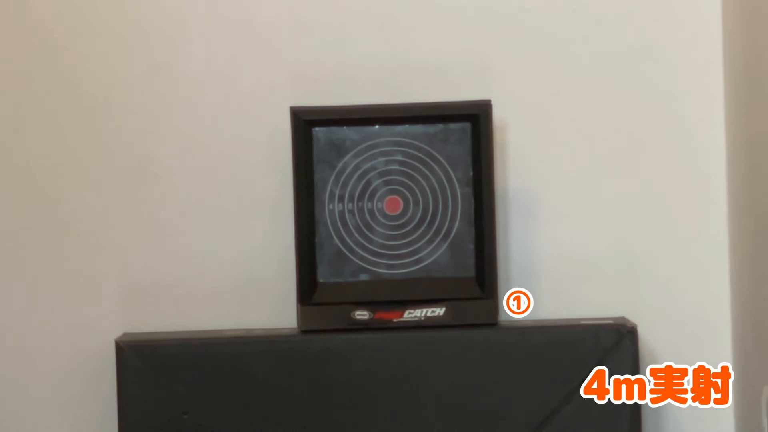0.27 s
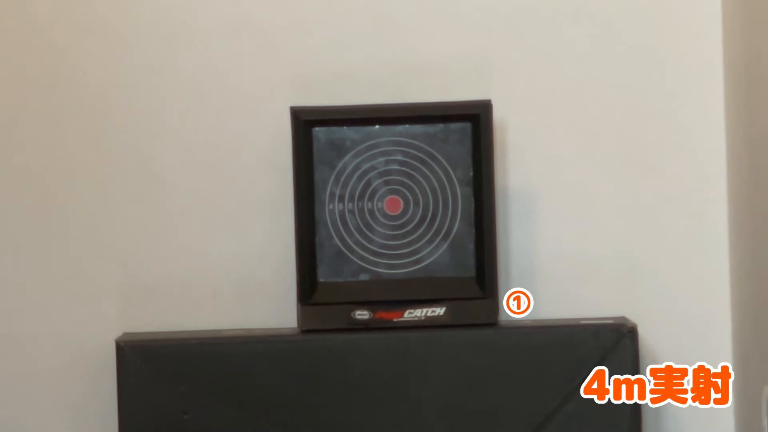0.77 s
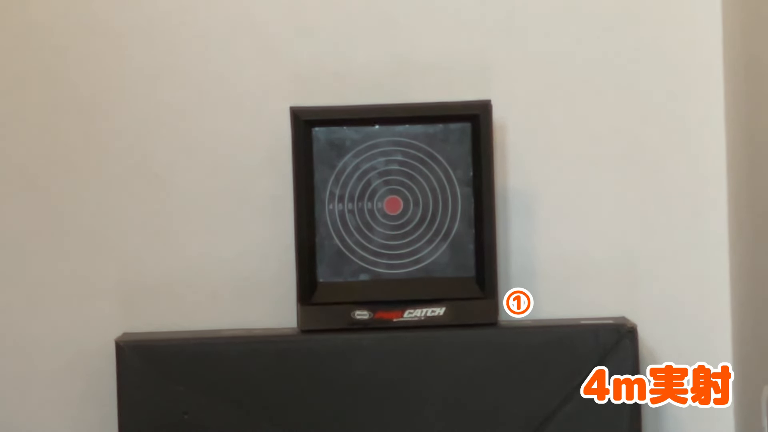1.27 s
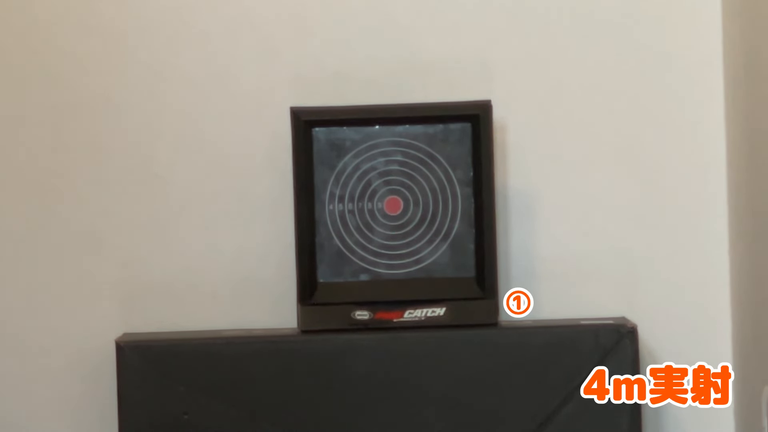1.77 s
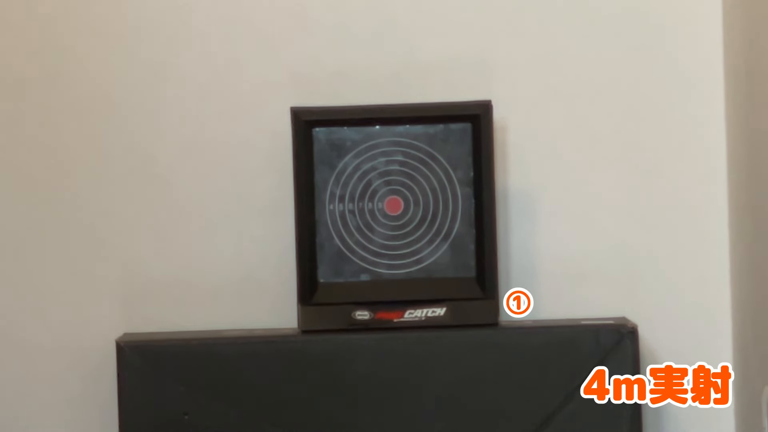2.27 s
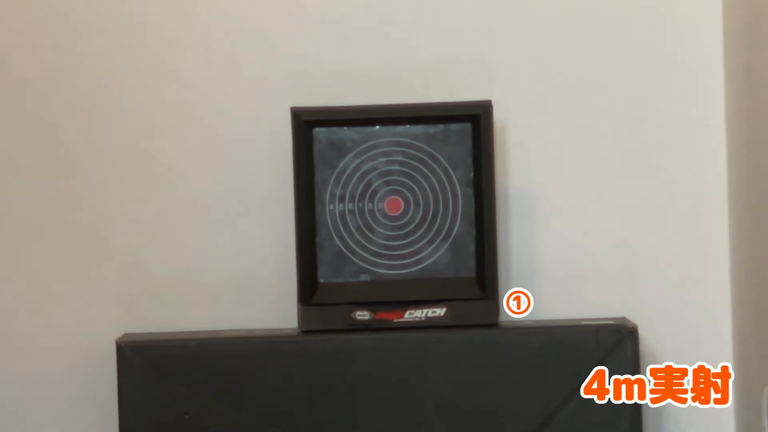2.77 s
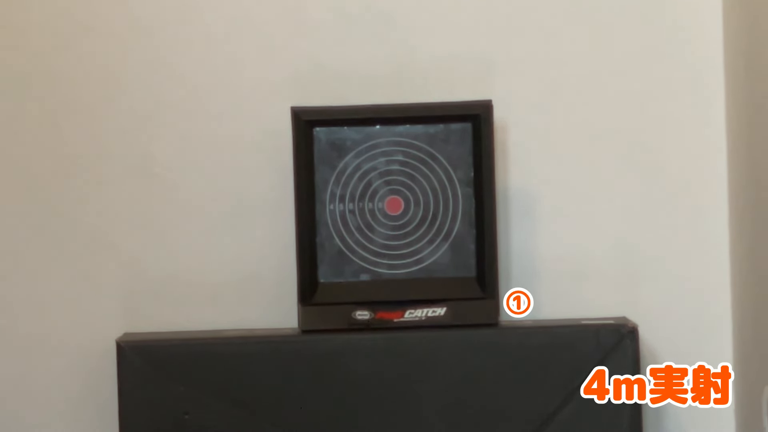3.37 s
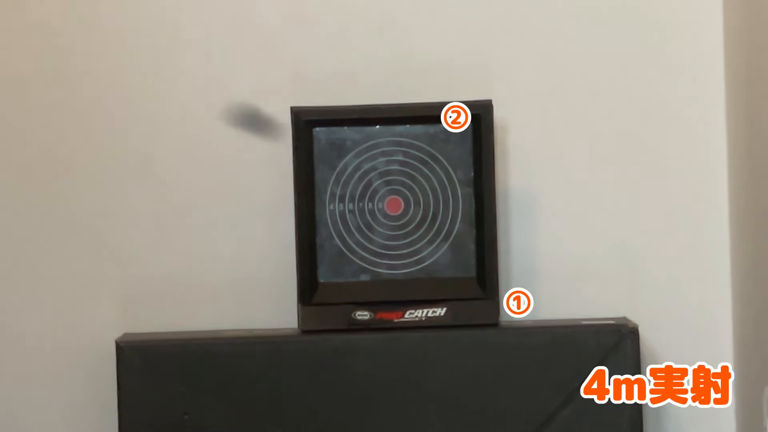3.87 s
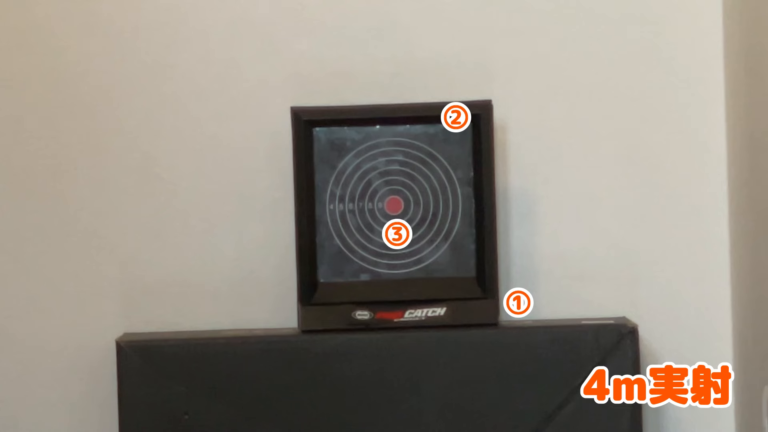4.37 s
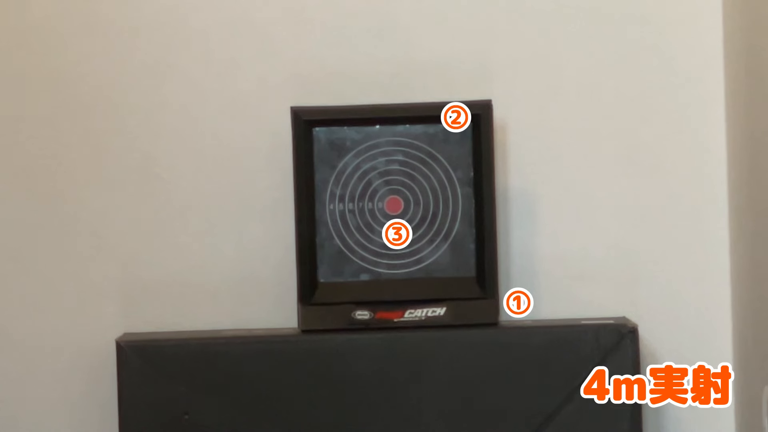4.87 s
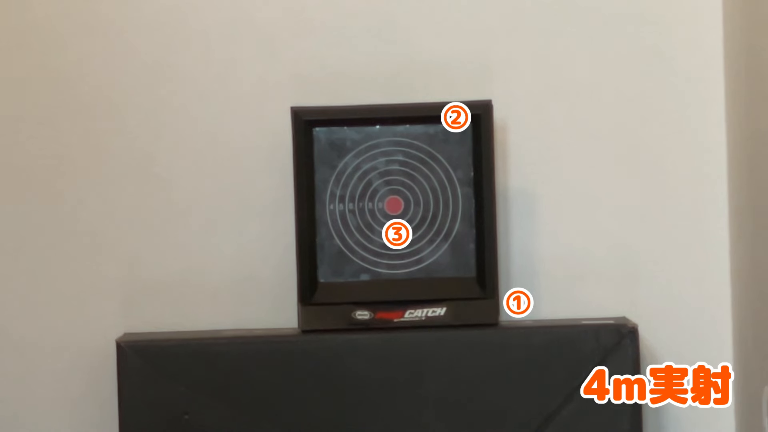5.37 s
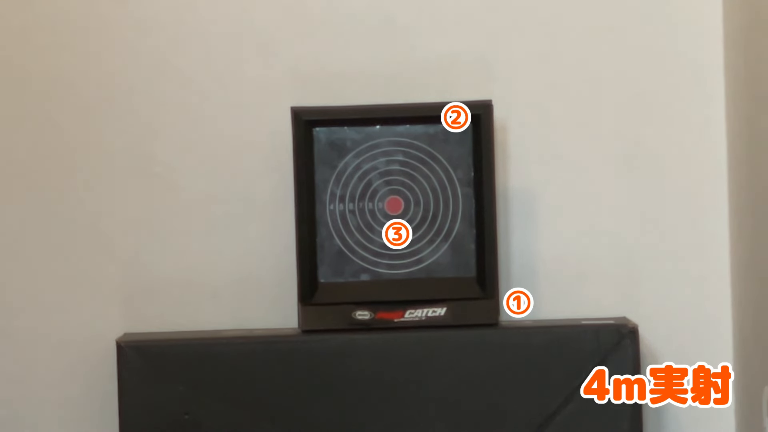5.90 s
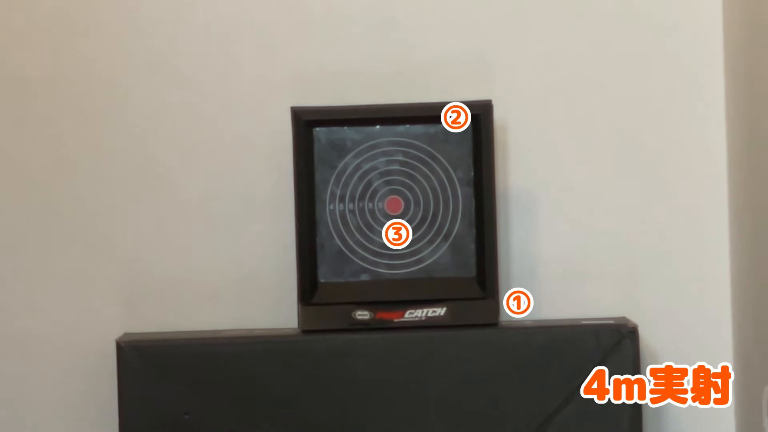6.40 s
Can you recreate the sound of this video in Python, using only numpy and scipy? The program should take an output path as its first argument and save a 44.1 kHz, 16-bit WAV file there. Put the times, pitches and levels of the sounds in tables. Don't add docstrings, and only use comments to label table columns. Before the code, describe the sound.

A toy electric pistol fires once in a bare room: sharp slap, gear rattle, deep knocks, then pellet and case bounce over hard floor.

```python
import sys
import numpy as np
from scipy import signal
from scipy.fft import rfft, irfft, next_fast_len
from scipy.io import wavfile
from scipy.ndimage import uniform_filter1d, map_coordinates

SR = 44100
rng = np.random.default_rng(int(sys.argv[2]) if len(sys.argv) > 2 else 0)


def dump_mix(stems):
    frames = np.atleast_2d(stems).T
    limited = np.clip(frames, -1, 1)
    pcm = np.round(limited * 32767).astype(np.int16)
    wavfile.write(sys.argv[1], SR, pcm)


def boost(x):
    u = np.asarray(x, float) / 20
    return 10 ** u


N = 292824
SPAN = SR * 3 // 4
LEAD = SR // 10


def unit(x):
    return x / np.sqrt(np.mean(x ** 2) + 1e-20)


def along(points, hz):
    f, v = np.transpose(points)
    return np.interp(np.log(hz + 1), np.log(f + 1), v)


def curve(rows):
    return np.interp(np.arange(N) / SR, *np.transpose(rows))


def wobble(rate):
    knots = rng.standard_normal(int(N * rate / SR) + 4)
    return map_coordinates(knots, [np.arange(N) * rate / SR])


def rush(spectrum):
    m = next_fast_len(N + 8192)
    gain = boost(along(spectrum, np.fft.rfftfreq(m, 1 / SR)))
    return unit(irfft(rfft(rng.standard_normal(m)) * gain, m)[:N])


def body(spectrum, tilt_db, part_hz, part_db, size=4096):
    hz = np.fft.rfftfreq(size, 1 / SR)
    part = part_db * np.exp(-(np.log2((hz + 1) / part_hz) / 0.35) ** 2)
    gain = boost(along(spectrum, hz) + part + tilt_db * np.log2((hz + 100) / 2000))
    cepstrum = irfft(np.log(gain + 1e-6))
    cepstrum[1:size // 2] *= 2
    cepstrum[size // 2 + 1:] = 0
    return irfft(np.exp(rfft(cepstrum)))[:size // 2]


# pitch_hz, t60_s
ROOM_DECAY = [(100, .6), (300, 0.43), (1000, 0.6), (3000, 0.57), (7000, 0.54), (15000, 0.36)]


def echo(gap_s, walls_db):
    hz, t, z = signal.stft(rng.standard_normal(SPAN), SR, nperseg=256)
    fade = boost(-60 * t / along(ROOM_DECAY, hz)[:, None])
    tail = signal.istft(z * fade, SR, nperseg=256)[1][:SPAN]
    t = np.arange(SPAN) / SR
    walls = np.repeat(rng.standard_normal(SPAN // 64 + 1), 64)[:SPAN]
    tail = tail * boost(walls_db * walls * np.exp(-t / 0.032))
    tail = tail * (1 - np.exp(-(t / gap_s) ** 2))
    return tail / np.linalg.norm(tail)


def add(track, s, sound):
    part = track[LEAD + round(s * SR):][:len(sound)]
    part += sound[:len(part)]


def blows(events, spectrum, click, rise_s, stop, gap_s, walls_db, part_db, far_db):
    track = np.zeros(LEAD + N)
    t = np.arange(SR // 20) / SR
    before = -1
    for s, db, tilt_db, t60, room_db, part_hz in events:
        fade = boost(-60 * (t / max(t60, 1e-3)) ** stop)
        force = rng.standard_normal(len(t)) * fade * (1 - np.exp(-t / rise_s))
        force[0] = click
        near = signal.fftconvolve(force, body(spectrum, tilt_db, part_hz, part_db))
        near *= boost(db) / np.abs(near).max()
        far = body(spectrum, tilt_db, part_hz, far_db)
        spread = np.linalg.norm(near) / np.linalg.norm(far)
        fresh = echo(gap_s, walls_db)
        if s - before < .002:
            fresh += uniform_filter1d(tail - fresh, size=5)
        before, tail = s, fresh
        add(track, s, near)
        add(track, s, boost(room_db) * spread * signal.fftconvolve(far, tail))
    return track[LEAD:]


def rings(events, overtone, rough):
    track = np.zeros(LEAD + N)
    t = np.arange(SR // 10) / SR
    for s, db, hz, t60, room_db in events:
        drift = rough * np.cumsum(rng.standard_normal(len(t)))
        tone = np.sin(2 * np.pi * hz * t + drift) + 0.34 * np.sin(2 * np.pi * overtone * hz * t)
        near = boost(db - 60 * t / max(t60, 1e-3)) * (1 - np.exp(-t / 0.00085)) * tone
        add(track, s, near)
        add(track, s, boost(room_db) * signal.fftconvolve(near, echo(0.0059, walls_db=7)))
    return track[LEAD:]


# pitch_hz, rms_db
HUM_LINES = [(242.2, -67.5), (360.7, -72), (414.5, -71), (511.4, -82.5), (769.8, -83.5)]


def hum():
    t = np.arange(N) / SR
    total = np.zeros(N)
    for hz, db in HUM_LINES:
        level = np.sqrt(2) * boost(db + 1.2 * wobble(12))
        total += level * np.sin(2 * np.pi * hz * t + .4 * wobble(6))
    return total


# time_s, level_db
AIR_LEVEL = [(0, -50), (1.5, -58), (2.5, -56), (3.5, -56), (5, -56), (6.64, -57)]
# pitch_hz, density_db_per_hz
AIR_COLOUR = [(41, -27), (70, 5.5), (154, -5), (205, -11.5), (243, -9), (300, -9), (385, -15.5), (415, -7),
              (450, -18), (505, -3), (550, -20.5), (960, -25), (1600, -32.5), (3500, -90.5)]


def ventilation():
    return boost(curve(AIR_LEVEL) + 0.69 * wobble(3)) * rush(AIR_COLOUR)


# time_s, level_db
DRAUGHT_LEVEL = [(0.0, -60), (0.13, -45), (1.42, -42), (1.7, -54), (1.76, -43), (2.61, -46), (2.7, -41.5),
                 (3.66, -41), (3.72, -52), (3.85, -40), (3.88, -54), (4.05, -42), (4.38, -49), (4.49, -39),
                 (4.86, -43), (6.18, -40), (6.55, -46.5), (6.64, -40)]
# pitch_hz, density_db_per_hz
DRAUGHT_COLOUR = [(4.7, -29), (8.0, 8.5), (25, 4), (40, -2), (64, -22), (90, -42), (120, -51), (200, -120)]
# pitch_hz, density_db_per_hz
HISS_COLOUR = [(300, -6), (1500, 0.9), (4000, -3), (13000, -9), (16000, -8)]


def draught_and_hiss():
    draught, hiss = rush(DRAUGHT_COLOUR), rush(HISS_COLOUR)
    gusts = boost(curve(DRAUGHT_LEVEL) + 1.6 + 1.5 * wobble(4.6))
    return gusts * draught + boost(-70) * hiss


# start_s, peak_db, tilt_db_per_octave, room_db, part_hz
KNOCKS = [
    (-.03, -7, 2.2, 6.5, 1250),
    (3.6420, -10, -4, -9, 500),
    (3.8502, 6.5, 3, -0.5, 520),
    (3.949, 2, 1.4, 2.5, 500),
    (4.1595, 1, 1.1, 5, 800),
]
# pitch_hz, density_db_per_hz
BOARD = [(35, -35), (90, -7.5), (140, -8.5), (220, -0.5), (330, -3), (500, 2), (700, -0.5), (1100, -3),
         (1600, -6), (2500, -10.5), (3800, -14), (6200, -23.5), (7400, -29.5), (16000, -51)]


def knocks():
    deep = []
    for s, db, tilt_db, room_db, hz in KNOCKS:
        t60_s = .034 * np.exp(.1 * room_db)
        deep.append((s, db, tilt_db, t60_s, room_db, hz))
    return blows(deep, BOARD, click=5.57, rise_s=0.0014, stop=0.92, gap_s=0.0017, walls_db=4.5,
                 part_db=7, far_db=3.5)


# pitch_hz, level_under_knock_db, t60_s
ROOM_MODES = [(86.4, -30, 0.26), (188, -29.5, 0.35), (239.3, -30, 0.2), (322, -34, 0.4)]
# start_s, boom_db, push_db
THUDS = [
    (-.03, -2, -40),
    (3.64, -8, -13),
    (3.85, -11, -22),
    (3.9499, 7, -25),
    (4.1602, 8.5, -21.5),
]


def boom():
    track = np.zeros(LEAD + N)
    t = np.arange(SPAN) / SR
    for s, boom_db, push_db in THUDS:
        modes = np.zeros(SPAN)
        for hz, level, t60 in ROOM_MODES:
            modes += boost(level + rng.normal(0, 1.5) - 60 * t / t60) * np.sin(2 * np.pi * hz * t)
        push = t / 0.0048 * (2 - t / 0.0011) * np.exp(-t / 0.0015)
        add(track, s, boost(boom_db) * (1 - np.exp(-t / 0.0036)) * modes + boost(push_db) * push)
    return track[LEAD:]


# time_s, level_db
TRAFFIC_LEVEL = [(0, -112), (1.5, -70), (2.2, -77), (2.9, -74), (3.5, -65), (4.5, -68), (5.8, -73.5),
                 (6.64, -73.5)]
# pitch_hz, density_db_per_hz
TYRES = [(500, -26.5), (720, 1.5), (950, -1.5), (1400, -15.5), (2500, -32.5)]


def traffic():
    return boost(curve(TRAFFIC_LEVEL) + 1.5 * wobble(7)) * rush(TYRES)


# start_s, peak_db, tilt_db_per_octave, room_db
SNAPS = [
    (.1880, -38, -6, -9),
    (4.161, -21.5, 15, -8.5),
    (4.3097, -7, -5, -7.5),
]
# pitch_hz, density_db_per_hz
CHIP = [(700, -30), (2500, -14), (4500, -9), (6000, -12), (9500, -9), (11500, -3), (13000, -2),
        (13800, -14), (16000, -18)]


def pellet_snaps():
    t60_s, part_hz = .015, 12900
    snaps = [(s, db, tilt_db, t60_s, room_db, part_hz) for s, db, tilt_db, room_db in SNAPS]
    return blows(snaps, CHIP, click=3.4, rise_s=0.00029, stop=1.08, gap_s=0.017, walls_db=13.0,
                 part_db=0, far_db=-6.5)


# start_s, peak_db, pitch_hz, room_db
TAPS = [(.2785, -30, 378, 7.5), (.2895, -23, 373, -18), (.3175, -16.5, 399, -5), (.4203, -7, 616, -10),
        (.4235, -18.5, 360, -4), (.4930, -29.5, 510, 8), (.5310, -30, 440, -12.5), (.5680, -27.5, 361, -11),
        (.7265, -31.5, 408, -17), (.7570, -31.5, 453, -13), (.8065, -40.5, 430, 11),
        (.9020, -20.5, 677, -5.5), (1.4270, -35, 450, -7), (4.3097, .5, 686, -16), (4.602, -28, 574, -3),
        (4.908, -25, 730, -7), (4.888, -45, 410, 3.5), (5.033, -37.5, 657, 10)]


def taps():
    events = []
    for s, db, hz, room_db in TAPS:
        cycles = 12.2 + 0.12 * db
        events.append((s, db, hz, cycles / hz, room_db))
    return rings(events, overtone=0.558, rough=0.014)


# start_s, peak_db, room_db, part_hz
BOUNCES = [(0.2984, -21.5, 1, 7600), (0.306, -24, 6.5, 14100), (0.4234, -27, -26, 1550),
           (0.4933, -42, -18, 5500), (0.5982, -24, 8, 3850), (.6001, -18.5, 1, 3650),
           (0.6024, -31, -22, 3520), (0.8412, -26.5, 6, 4200), (.9760, -26, 4.5, 3800),
           (4.6012, -22, 9.5, 3700), (4.7000, -31, 3, 3000), (4.7963, -30, 5, 3860), (4.862, -39, 1, 3900),
           (5.0317, -27, 6.5, 4130), (5.2192, -37.5, 6, 3080)]
# start_s, peak_db, tilt_db_per_octave, room_db, part_hz
SKIPS = [
    (1.0850, -26, -3.5, 2.5, 2600),
    (1.1505, -28.5, -4.5, -3, 2600),
    (1.4285, -39.5, -9, -6, 870),
    (1.456, -49, -6, -3, 3000),
    (2.467, -51, -11, -5, 1700),
    (2.6452, -39.5, -5.5, -5, 3920),
    (4.8872, -23.5, -4.5, 4, 950),
    (5.42, -49, -6, 2, 2900),
    (5.485, -56.5, -6, 10, 2500),
]
# pitch_hz, density_db_per_hz
PELLET = [(150, -38), (350, -8.5), (900, -9.5), (2300, -3.5), (6600, -5), (8300, -6), (9300, -11),
          (14500, -24.5), (16000, -22)]


def bounces():
    s, db, room_db, hz = np.transpose(BOUNCES)
    lone_t60_s = .015
    nearest = np.sort(np.abs(s - s[:, None]), axis=1)[:, 1]
    chatter = nearest < .003
    t60 = np.where(chatter, 0.0043, lone_t60_s)
    tilt_db = np.where(chatter, .6, -1.4)
    skips = [(at, level, tilt, lone_t60_s, wet, part) for at, level, tilt, wet, part in SKIPS]
    landings = sorted(skips + list(zip(s, db, tilt_db, t60, room_db, hz)))
    return blows(landings, PELLET, click=0.97, rise_s=0.0012, stop=1.09, gap_s=0.0062, walls_db=6.5,
                 part_db=6.0, far_db=2.5)


# time_s, pitch_hz, level_db
WHINE = [
    (1.42, 1409, -98),
    (1.522, 1347, -71),
    (1.661, 1165, -69),
    (1.78, 1090, -80),
    (1.88, 1006, -95),
]


def motor_whine():
    s, hz, db = np.transpose(WHINE)
    turns = np.cumsum(curve(np.c_[s, hz]) * (1 + 0.035 * wobble(98))) / SR
    return boost(curve(np.c_[s, db]) + 3 * wobble(30)) * np.sin(2 * np.pi * turns)


# start_s, peak_db, pitch_hz
TICKS = [
    (1.571, -51, 1270),
    (2.1255, -51, 1620),
    (2.275, -49, 600),
    (2.745, -59, 6400),
    (2.964, -54, 914),
    (3.055, -60, 6500),
    (3.112, -49, 800),
    (6.1283, -45, 1215),
]


def ticks():
    t60_s, room_db = 0.025, -14
    return rings([(s, db, hz, t60_s, room_db) for s, db, hz in TICKS], overtone=1.0, rough=0.085)


# start_s, peak_db, tilt_db_per_octave, room_db, part_hz
ACTION = [
    (3.6040, -11.5, 1.5, -9, 4000),
    (3.6303, -22, 2, -7, 4417),
    (3.6350, 0.5, 4.5, -1, 10520),
    (3.637, 4, .3, 0, 4352),
    (3.6417, 0.5, 0.5, -0.5, 1400),
    (3.6440, 1, -1.5, -5, 4300),
    (3.844, -3.5, 2.5, -4, 4400),
    (3.8524, 0.5, -0.5, 0.5, 7980),
]
# pitch_hz, density_db_per_hz
GUN = [(120, -47), (200, -23), (347, -18.5), (416, 4.5), (671, -1), (1140, -6.5), (1500, -2.5),
       (3250, -8.5), (6280, -12), (16000, -34)]


def action():
    t60_s = 0.012
    strokes = [(s, db, tilt_db, t60_s, room_db, hz) for s, db, tilt_db, room_db, hz in ACTION]
    return blows(strokes, GUN, click=1.0, rise_s=.0003, stop=1.1, gap_s=.006, walls_db=-1.5,
                 part_db=11.5, far_db=4.0)


# start_s, peak_db, t60_s
GEARS = [(3.7516, -1.5, 0.018), (3.7566, -6.5, 0.025), (3.765, -8, 0.023), (3.771, -11, 0.019),
         (3.7758, -5.5, 0.015), (3.7797, -8.5, .016), (3.7831, -5.5, .01), (3.7906, -8.5, .014),
         (3.7960, 2, 0.0052), (3.803, 1, .014), (3.8062, -1.5, .017), (3.8173, 2, .014), (3.8212, 3, .011)]
# time_s, part_hz, room_db
SLIDE = [(3.752, 4500, -4.5), (3.785, 4500, -6), (3.806, 3680, -9.5), (3.818, 3750, -8.5),
         (3.822, 4650, -7.5)]
# pitch_hz, density_db_per_hz
TEETH = [(180, -54.5), (300, -20), (500, -6.5), (1150, -7.5), (1600, 0.5), (2500, -13.5), (4200, -7.5),
         (6000, -16), (7100, -10.5), (9000, -14), (11300, -13), (16000, -25.5)]


def gears():
    at, part_hz, wet_db = np.transpose(SLIDE)
    tilt_db = 0.26
    teeth = []
    for s, db, t60 in GEARS:
        teeth.append((s, db, tilt_db, t60, np.interp(s, at, wet_db), np.interp(s, at, part_hz)))
    return blows(teeth, TEETH, click=0.28, rise_s=0.0004, stop=2.4, gap_s=0.031, walls_db=5.5,
                 part_db=11.0, far_db=8)


def scene():
    pistol = action() + gears() + knocks() + boom()
    small_things = bounces() + pellet_snaps() + taps() + ticks()
    street = motor_whine() + traffic()
    background = hum() + ventilation() + draught_and_hiss()
    return (pistol + small_things + street + background)[None]


def top_cut(x):
    return signal.sosfilt(signal.butter(12, 16420, fs=SR, output="sos"), x)


def record(dry):
    heard = signal.sosfilt(signal.cheby2(10, 50, 16300, fs=SR, output="sos"), dry)
    clipped = heard / (1 + np.abs(heard) ** 12) ** (1 / 12)
    return top_cut(clipped)


dry = scene()
out = record(dry)
dump_mix(out)
```